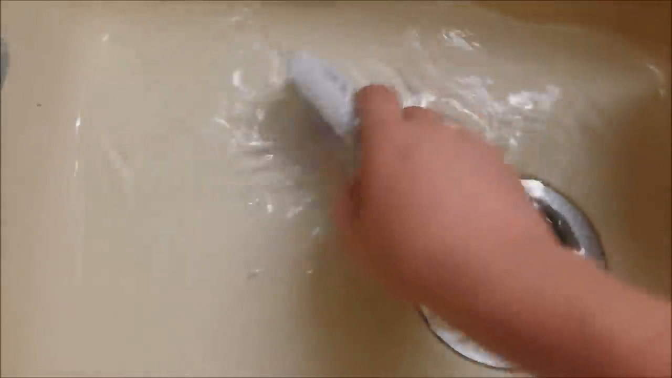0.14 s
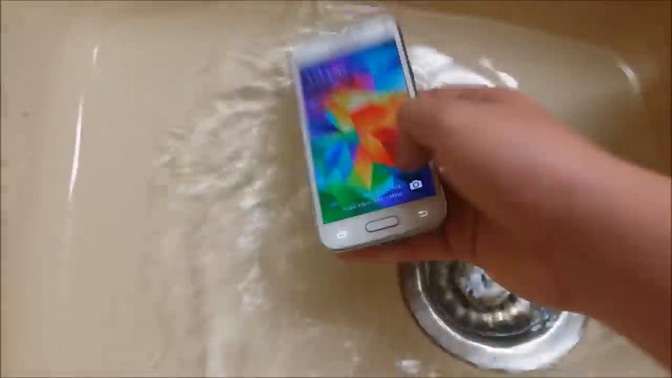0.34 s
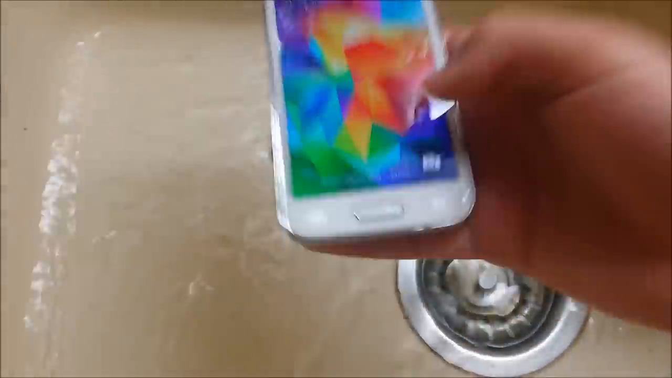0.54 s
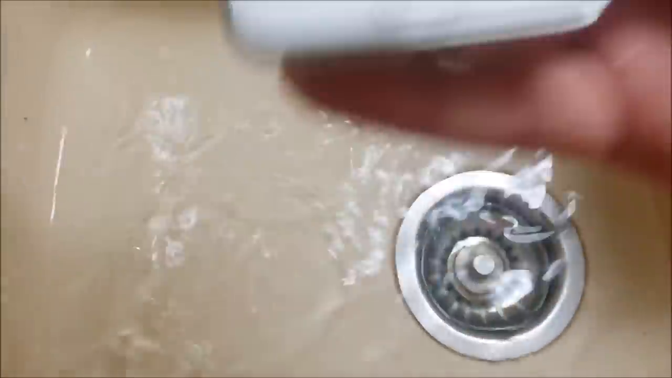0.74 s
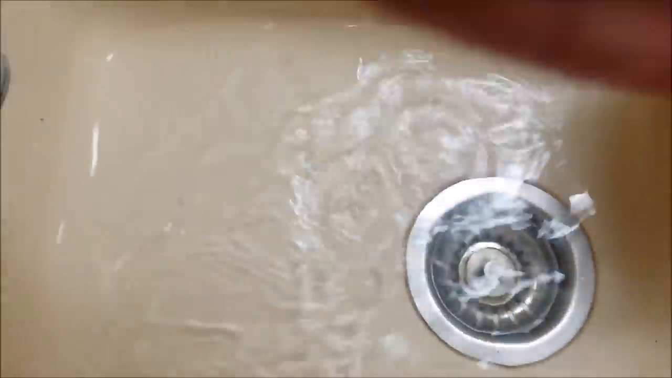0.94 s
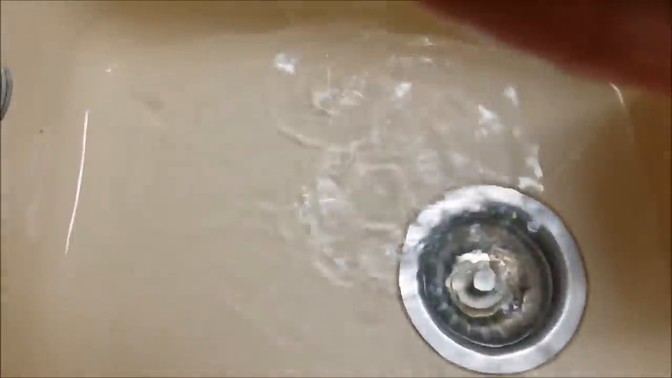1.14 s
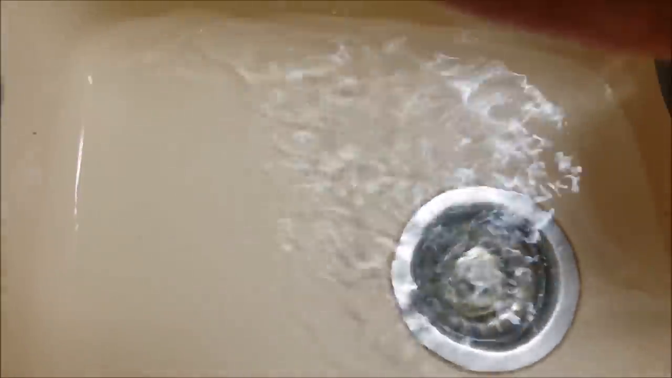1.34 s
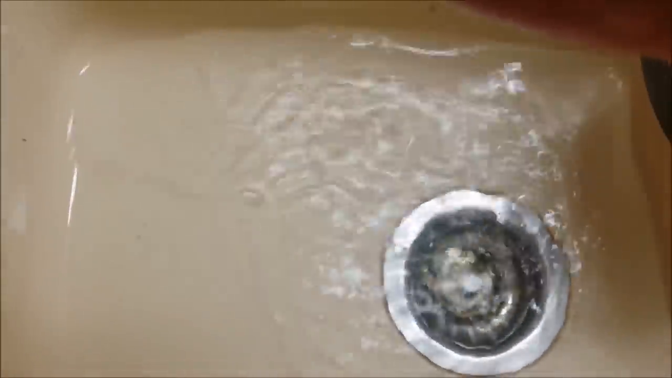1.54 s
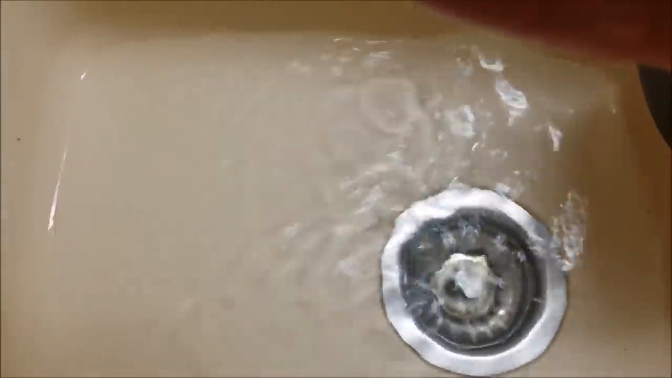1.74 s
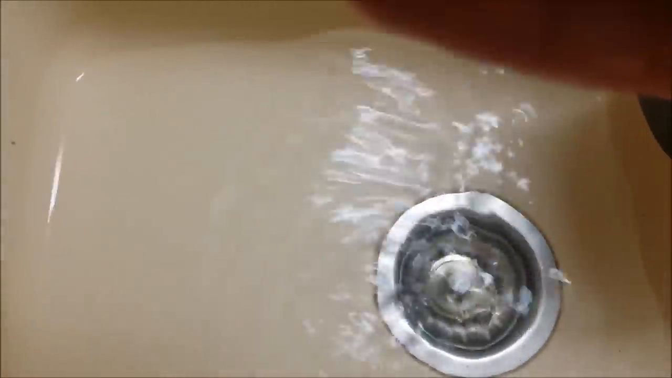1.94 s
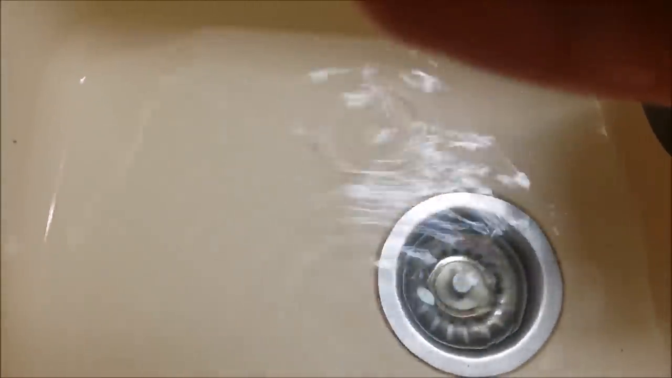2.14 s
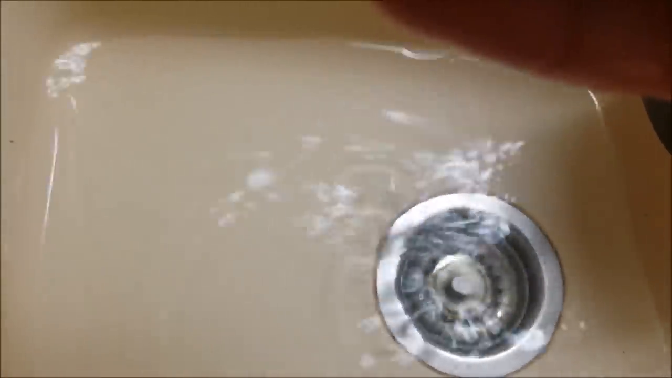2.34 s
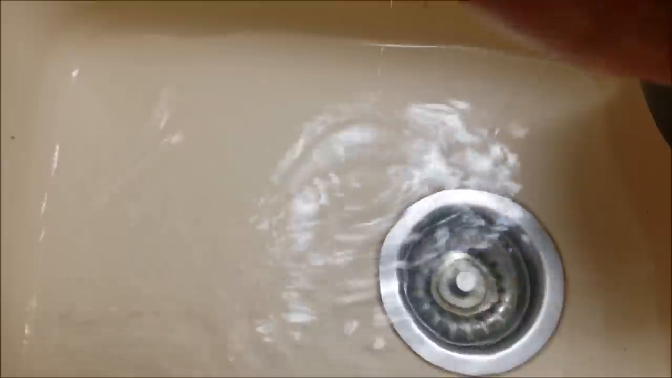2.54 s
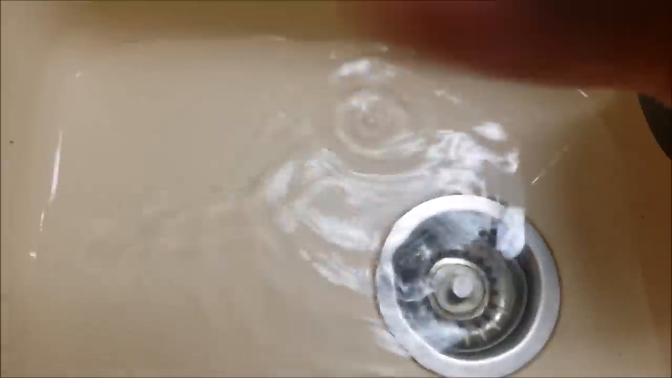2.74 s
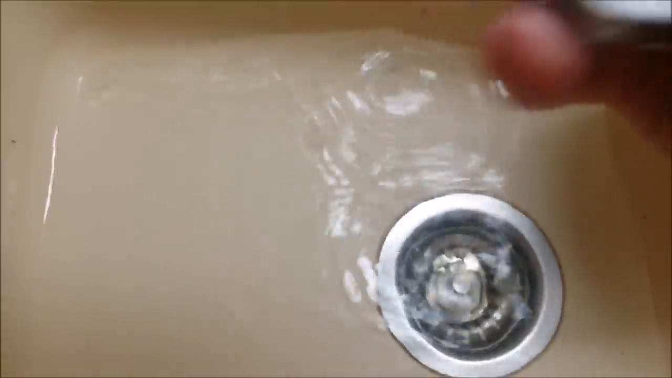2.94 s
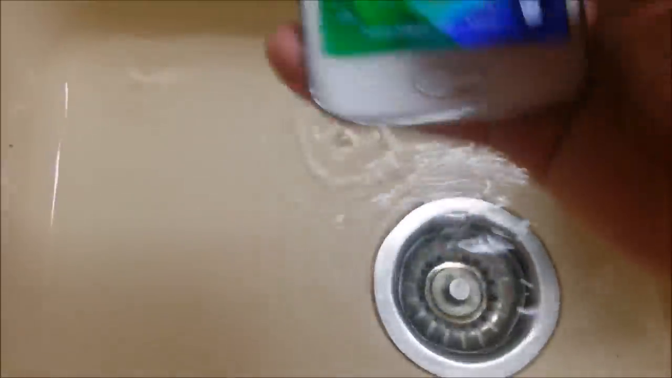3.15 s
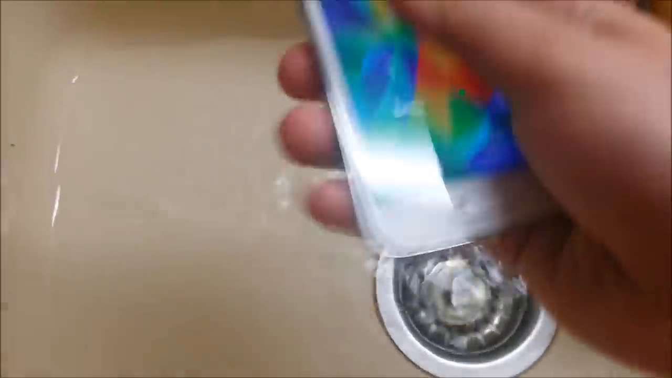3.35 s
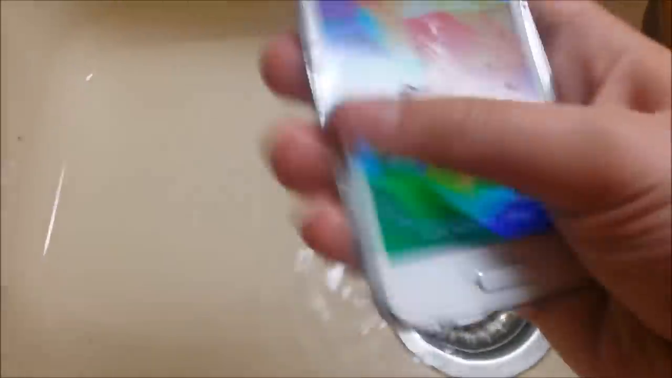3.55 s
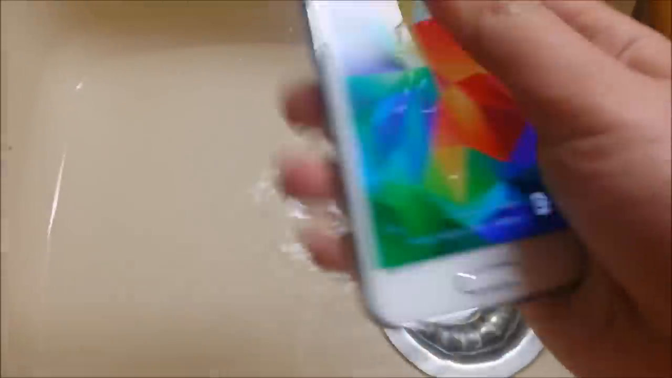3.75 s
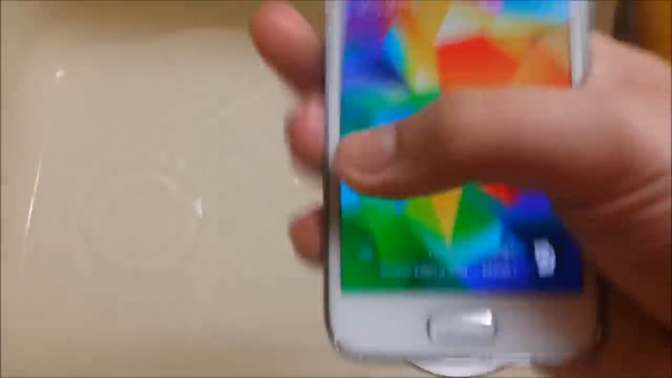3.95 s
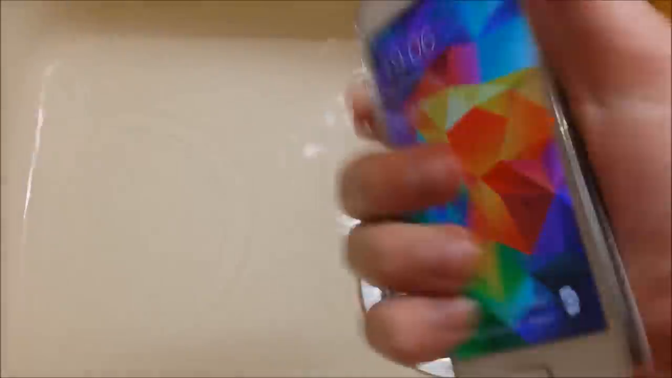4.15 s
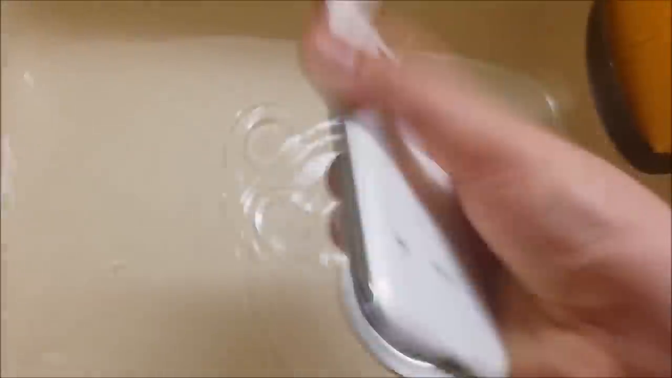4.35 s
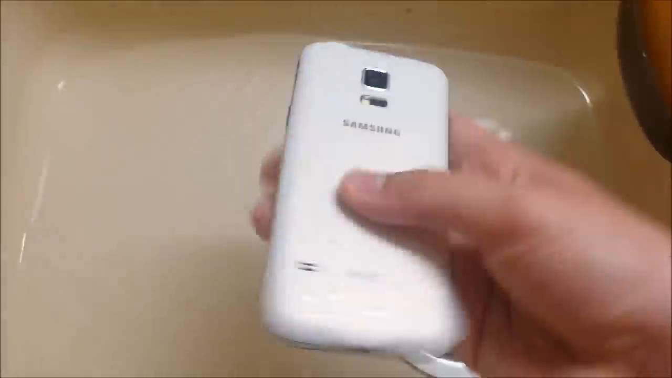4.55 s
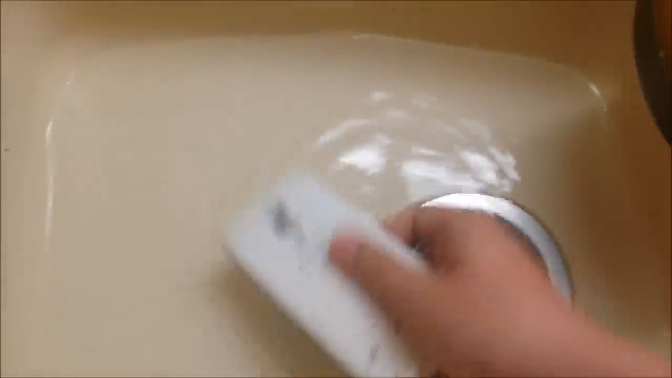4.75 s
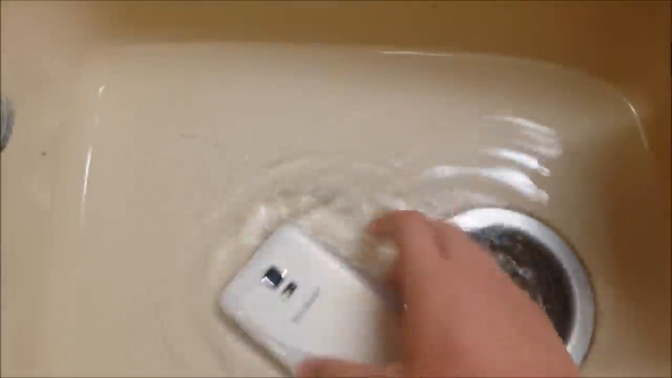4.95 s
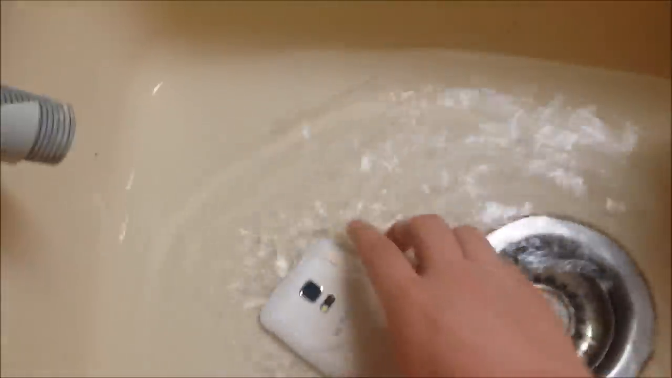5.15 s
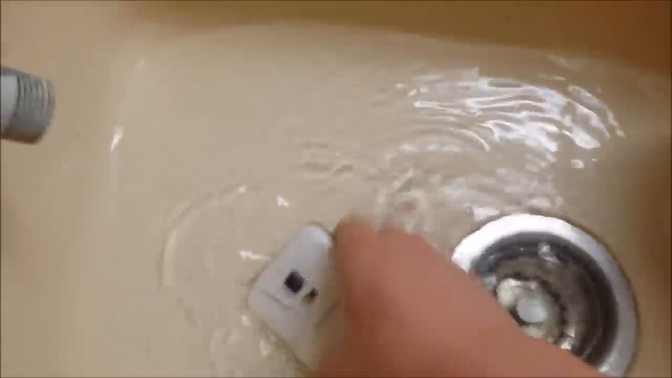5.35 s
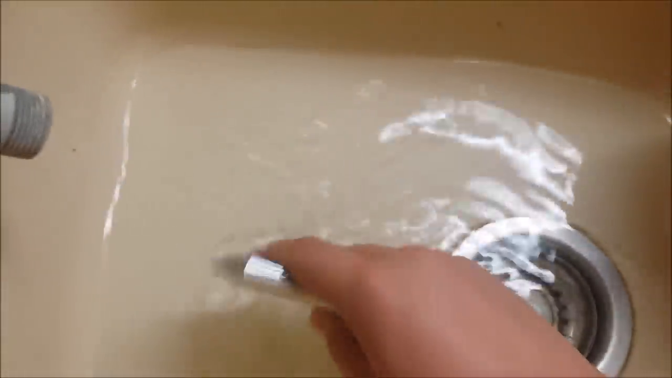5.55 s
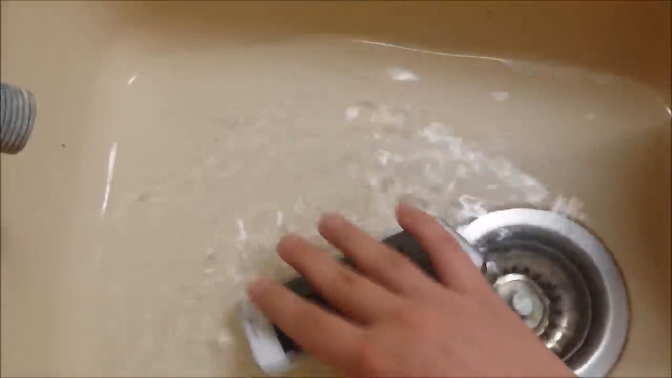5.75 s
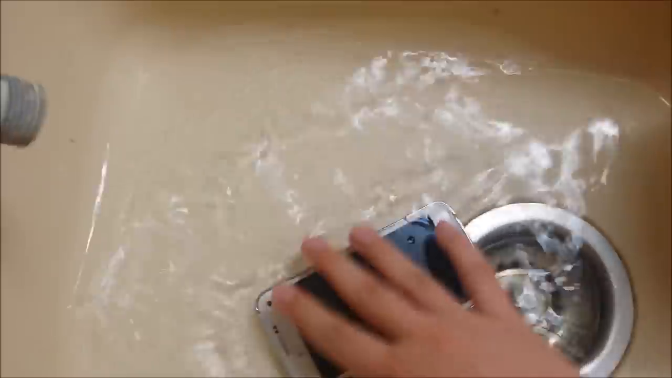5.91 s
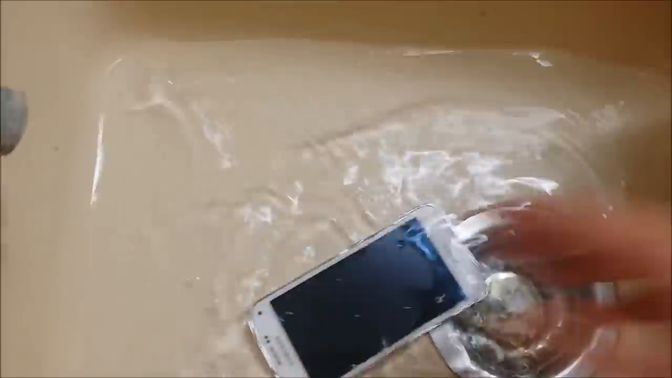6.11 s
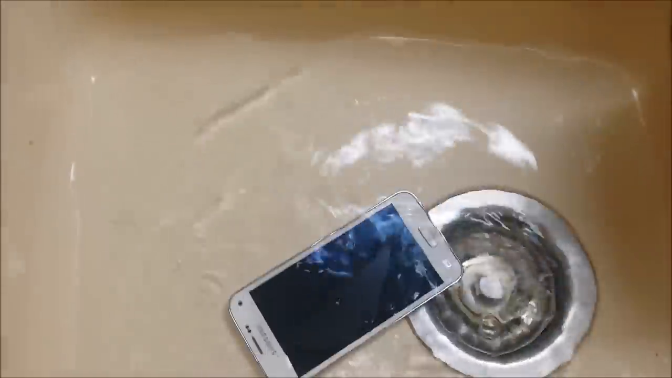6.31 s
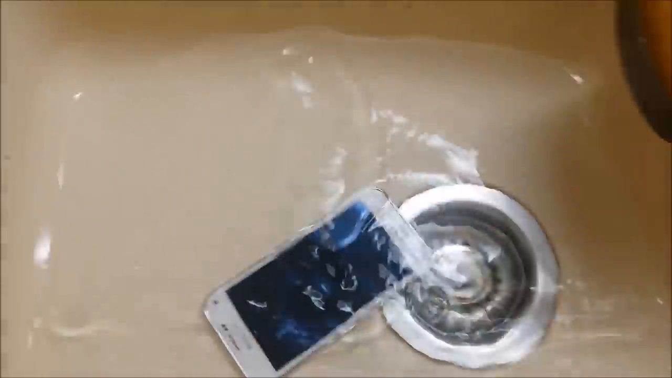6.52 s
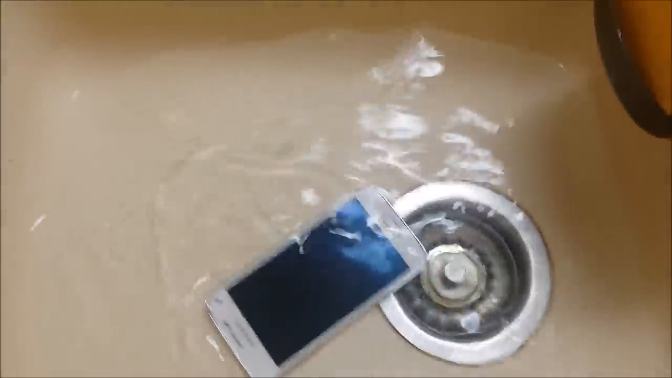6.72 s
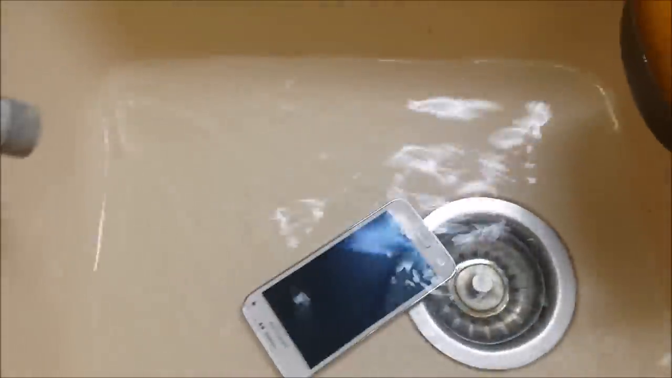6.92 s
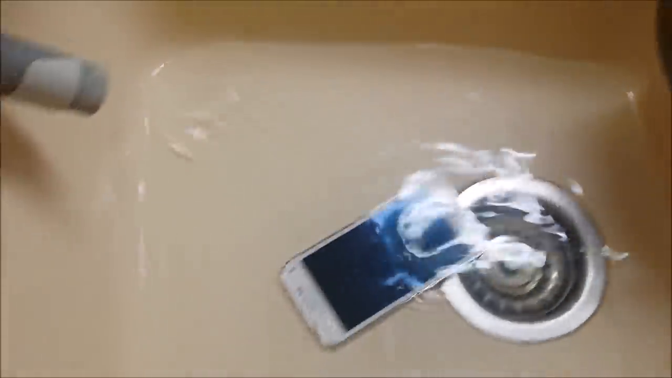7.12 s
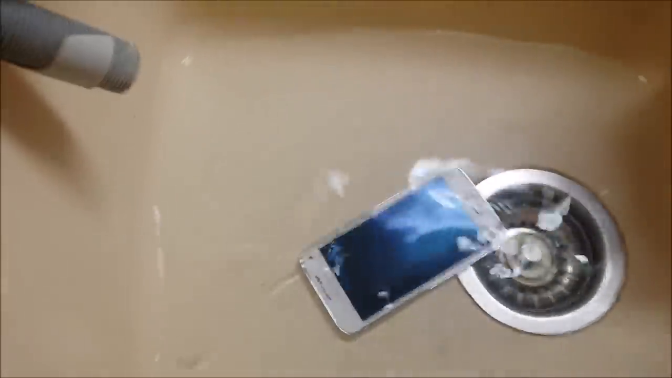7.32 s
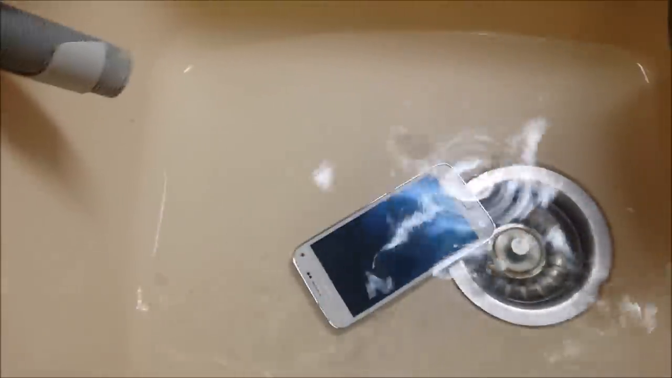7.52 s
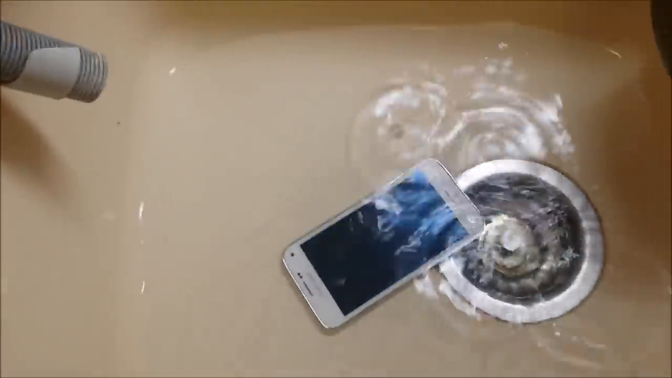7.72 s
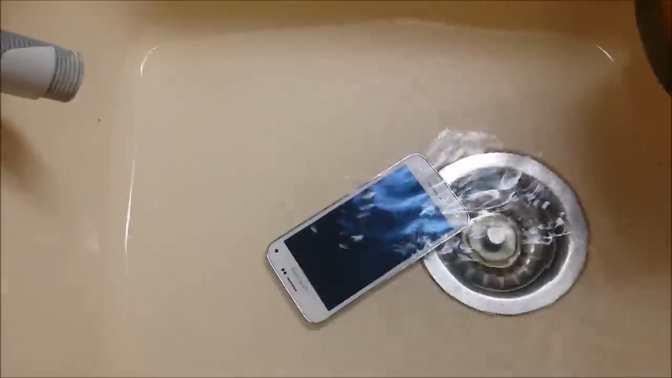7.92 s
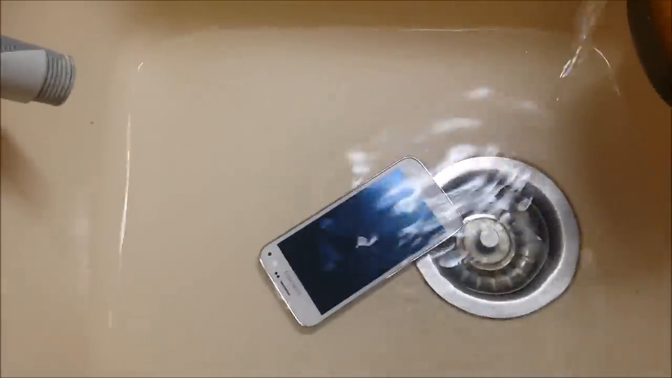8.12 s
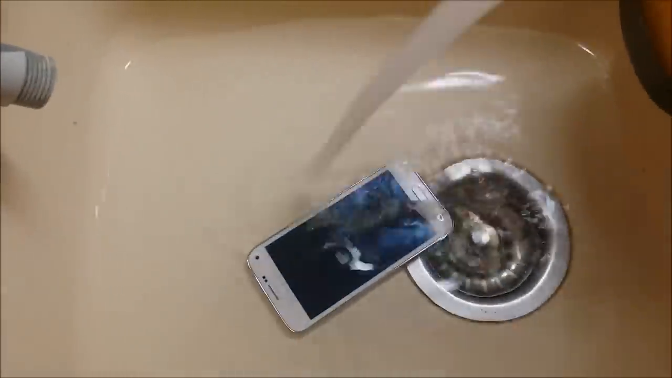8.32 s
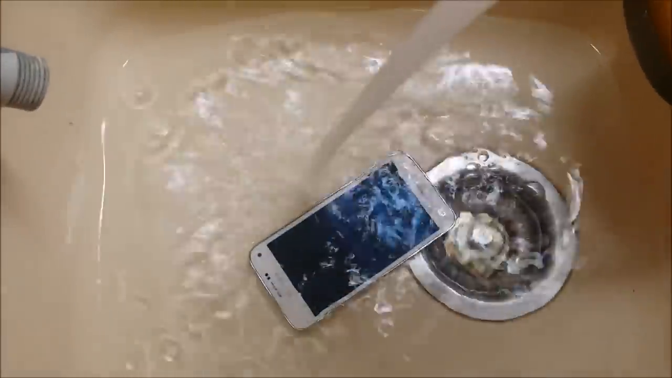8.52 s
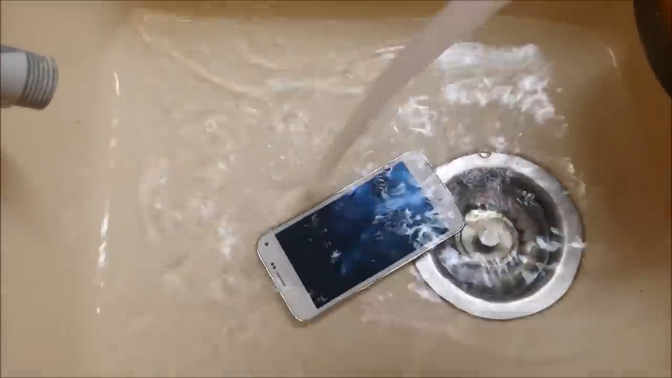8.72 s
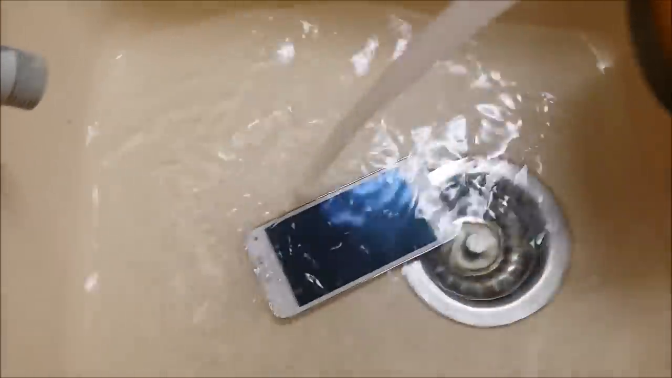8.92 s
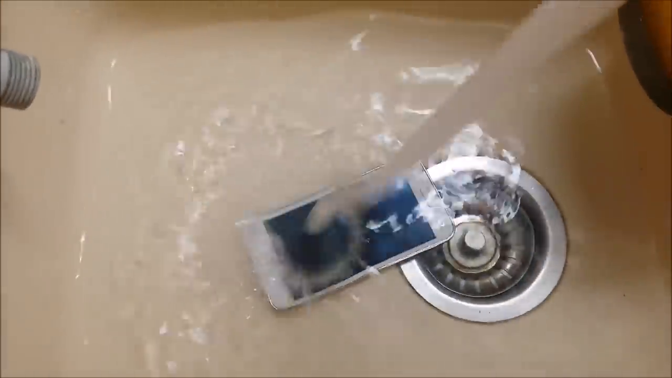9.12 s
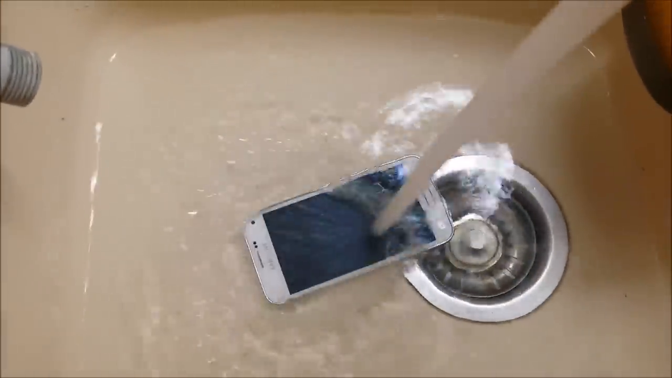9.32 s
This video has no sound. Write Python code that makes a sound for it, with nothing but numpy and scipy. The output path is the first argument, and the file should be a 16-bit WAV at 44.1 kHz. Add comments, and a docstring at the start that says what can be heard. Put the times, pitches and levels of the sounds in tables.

```python
"""Drips and sloshing come first, as a hand lifts a phone out of a shallow sink; a faint hum lies behind.
A wet thumb taps and rubs the glass: struck and slipping contacts ring the phone's modes.
The phone is laid back and knocks the ringing sink; drops are noise splats with rising bubble tones.
At the end a tap opens to a trickle, then a jet, made of hissing noise bands and bubble grains.
Two microphone ports close above: the right bright, the left shaded; the recorder's grip creaks at the left."""
import sys
import numpy as np
from scipy import signal
from scipy.fft import rfft, irfft, next_fast_len
from scipy.io import wavfile
from scipy.ndimage import uniform_filter1d

SR = 44100
rng = np.random.default_rng(int(sys.argv[2]) if len(sys.argv) > 2 else 0)


def unload_audio(sound):
    """Save the sound as a 16-bit wav file, at the path given as the first command line argument."""
    columns = np.transpose(np.atleast_2d(sound))
    # keep every value between -1 and 1, then stretch to whole-number steps
    steps = np.round(np.clip(columns, -1, 1) * 32767)
    wavfile.write(sys.argv[1], SR, steps.astype(np.int16))


N = 417627
T = np.arange(N) / SR   # s

# Colour of a splat on water or wet glass. Each row: frequency in Hz, density in dB per Hz.
SPLAT_COLOUR = [(300, -5), (800, -0.5), (2500, 0.5), (8800, 9), (16000, -0.5)]
# Modes of the phone held in the hand. Each row: frequency in Hz, level in dB, t60 in seconds (taps only).
PHONE_MODES = [(265, 0, 0.05), (700, -4.5, 0.046), (832, -2, 0.042), (1063, -8.5, 0.09),
               (1375, 8.5, 0.0082), (2010, 3, 0.015), (2580, 2, 0.0076), (3260, 1.5, 0.018)]


def from_db(db):
    """Gain of a level in dB."""
    return 10 ** (np.asarray(db) / 20)


def rms_one(x):
    """Scaled to rms 1."""
    return x / np.sqrt(np.mean(x ** 2) + 1e-20)


def in_time(rows):
    """Columns of a level curve in dB at every sample; -120 dB outside it."""
    s, *columns = np.transpose(rows)
    return [np.interp(T, s, column, left=-120, right=-120) for column in columns]


def at_hz(points, hz):
    """A spectrum read on a log frequency axis."""
    points = np.array(points)
    return np.interp(np.log(hz), np.log(points[:, 0]), points[:, 1])


def coloured(x, db_of_hz):
    """Filter by a smooth gain curve in dB."""
    size = next_fast_len(N)
    hz = np.maximum(np.arange(size // 2 + 1) * SR / size, 1)
    return irfft(rfft(x, size) * from_db(db_of_hz(hz)), size)[..., :N]


def band(x, low_hz, high_hz):
    """Butterworth band-pass."""
    edges = [low_hz, min(high_hz, .45 * SR)]
    return signal.sosfilt(signal.butter(2, edges, "band", fs=SR, output="sos"), x)


def soft(x, cut_hz):
    """A soft contact: two one-pole low-passes."""
    r = np.exp(-2 * np.pi * cut_hz / SR)
    return signal.lfilter([(1 - r) ** 2], [1, -2 * r, r * r], x)


def drift(rate):
    """Slow random wander of rms 1, low-passed at rate (Hz) on every 20th sample."""
    r = np.exp(-2 * np.pi * rate * 20 / SR)
    slow = signal.lfilter([1], [1, -2 * r, r * r], rng.standard_normal(N // 20 + 2002))[2000:]
    return np.interp(np.arange(N) / 20, np.arange(len(slow)), rms_one(slow))


def swells(events_db, rise_db_per_s, fall_db_per_s):
    """Gain that climbs to each (s, dB) and falls away after it."""
    gain = 0
    for s, db in events_db:
        below_db = np.where(T < s, rise_db_per_s * (s - T), fall_db_per_s * (T - s))
        gain = gain + from_db(db - below_db)
    return gain


def add(out, s, x):
    """Mix x into out from time s."""
    i = round(s * SR)
    out[i:i + len(x)] += x[:N - i]


def ring(clicks, hz, t60):
    """A resonator: a unit click sets a dying sine of initial height 1 ringing."""
    r, w = from_db(-60 / (t60 * SR)), 2 * np.pi * hz / SR
    return signal.lfilter([0, np.sin(w)], [1, -2 * r * np.cos(w), r * r], clicks + 1e-18)


def struck(events, modes, scatter_db, spread_db=0):
    """Every blow excites every mode by chance; spread_db per octave weakens modes far from its last column (Hz)."""
    out, rows = 0, np.array(events)
    places = np.round(rows[:, 0] * SR).astype(int)
    chance = rng.standard_normal((len(events), len(modes)))
    for k, (hz, level_db, t60) in enumerate(modes):
        clicks = np.zeros(N)
        away_db = spread_db * np.abs(np.log2(hz / np.abs(rows[:, -1])))
        clicks[places] = from_db(rows[:, 1] + level_db + scatter_db * chance[:, k] - away_db)
        out = out + ring(clicks, hz, t60)
    return out


def dying_noise(events_db, t60):
    """White noise that swells quickly at each (s, dB) and dies away."""
    rise_s = 0.0014
    clicks = np.zeros(N)
    clicks[[round(s * SR) for s, db in events_db]] = from_db([db for s, db in events_db])
    fall = signal.lfilter([1], [1, -from_db(-60 / (t60 * SR))], clicks + 1e-18)
    return soft(fall, 1 / (2 * rise_s)) * rng.standard_normal(N)


def stereo_noise(db_of_hz):
    """Two channels of noise, most alike in the bass and little related above; rms 1."""
    # Likeness of left and right. Each row: frequency in Hz, likeness from -1 to 1.
    likeness = [(60, 1), (240, 0.78), (950, -0.15), (3770, -0.19), (15000, 0.16)]

    def share_db(hz, sign):
        return db_of_hz(hz) + 10 * np.log10(1 + sign * np.clip(at_hz(likeness, hz), -.99, .99))

    mid = coloured(rng.standard_normal(N), lambda hz: share_db(hz, 0.85))
    side = coloured(rng.standard_normal(N), lambda hz: share_db(hz, -1))
    return rms_one(np.array([mid + side, mid - side]))


def bubble(hz, t60, rise):
    """A ringing bubble whose pitch climbs by the share rise while it dies."""
    life = np.minimum(T[:round(t60 * SR) + 2] / t60, 1)
    return np.sin(2 * np.pi * hz * t60 * life * (1 + rise * life / 2)) * from_db(-60 * life)


def grains(per_s, low_hz, high_hz, cycles, size_db):
    """Random bubbles of uneven size, each dying by 60 dB in the given cycles; rms 1."""
    sizes = from_db(size_db * np.minimum(rng.exponential(1, N), 4)) * rng.choice([-1, 1], N)
    born, dealt = rng.random(N) < per_s / SR, rng.integers(0, 16, N)
    out = 0
    for k, hz in enumerate(np.geomspace(low_hz, min(high_hz, .3 * SR), 16)):
        births = sizes * born * (dealt == k)
        out = out + signal.oaconvolve(births, bubble(hz, cycles / hz, .5))[:N]
    return rms_one(out)


def room_air():
    """Far hiss is coloured noise, the mains hum a wavering sine, the stir of hands and water low noise."""
    # Colour of the far hiss. Each row: frequency in Hz, density in dB per Hz.
    air_colour = [(25, -15.5), (85, 8.5), (140, -5.5), (230, -24.5), (450, -11.5), (750, -20), (1100, -13),
                  (1900, -22), (3300, -15.5), (6000, -29.5), (8500, -23), (16000, -31)]
    # Its lean to one side. Each row: frequency in Hz, left over right in dB.
    air_balance = [(60, -1), (240, -14.5), (950, -2.5), (3770, 4.5), (15000, -8.5)]
    # Mains hum. Each row: frequency in Hz, typical rms level in dB.
    hum_lines = [(200, -77.5)]
    # Low stir of hands and water. Each row: time in seconds, level in dB.
    stir_curve = [(0, -52), (.9, -70), (2.8, -74.5), (3.4, -57.5), (4.6, -59), (7, -64), (8.1, -82.5),
                  (8.5, -57), (9.47, -55)]
    air = stereo_noise(lambda hz: at_hz(air_colour, hz))
    air = coloured(air, lambda hz: at_hz(air_balance, hz) * np.array([[.5], [-.5]]))
    hum = 0
    for hz, db in hum_lines:
        # 3 dB from the rms of a sine to its peak
        hum = hum + from_db(db + 3.0 + 1.6 * drift(4.8)) * np.sin(2 * np.pi * hz * T)
    flat = stereo_noise(lambda hz: 0 * hz)
    stir = from_db(in_time(stir_curve)[0]) * rms_one(band(flat, 64, 200))
    return from_db(-64.5) * air + hum + stir


def creaks():
    """The grip creaks on the recorder: uneven clicks and gritty chatter ring through the case."""
    # Each row: start in seconds, length in seconds, slips per second, level in dB rms.
    creak_rows = [(0.82, 0.038, 48, -62.5), (3.959, 0.059, 487, -30), (3.981, 0.0026, 410, -28),
                  (4.397, 0.0029, 300, -36), (4.365, 0.072, 454, -33.5), (4.432, 0.049, 150, -47),
                  (4.524, 0.021, 380, -36), (4.561, 0.024, 250, -37.5), (4.602, 0.02, 100, -45.5),
                  (8.132, 0.0038, 130, -52)]
    out = np.zeros(N)
    for s, length, per_s, db in creak_rows:
        n, count = round(length * SR), max(round(length * per_s), 1)
        place, size, grit = rng.random(64), rng.random(64), rng.standard_normal(4000)
        clicks = np.zeros(n + 400)
        spots = ((np.arange(count) + place[:count]) / count * n).astype(int)
        clicks[spots] = -from_db(-4.5 - 19 * size[:count])
        chatter = 0.00083 * np.sqrt(per_s) * grit[:n]
        clicks[:n] = (clicks[:n] + chatter) * (0.14 + np.hanning(n))
        body = ring(clicks, 2580, .002) + ring(clicks, 1700, .003)
        body = body + .7 * ring(clicks, 900, .005) + .4 * ring(clicks, 300, .012)
        add(out, s, from_db(db) * body / np.std(body[:max(n, 400)]))
    return soft(out, 8900)


def palm_bumps():
    """The palm bumps the recorder's case, which answers with a low ring."""
    # Each row: time in seconds, level in dB.
    bump_rows = [(3.979, -25), (4.398, -32), (4.538, -16)]
    # Mode of the case. Each row: frequency in Hz, level in dB, t60 in seconds.
    case_modes = [(137, -2.5, 0.028)]
    return struck(bump_rows, case_modes, scatter_db=3)


def loose_water():
    """Water runs off hand and phone after moves: fine spray crackles in clumps, larger bubbles slosh."""
    # Each row: time in seconds, fine spray level in dB, slosh level in dB.
    splashes = [(0.0, -71, -50), (0.197, -59, -51), (0.328, -57, -43), (1.555, -51, -64), (4.42, -49, -56),
                (4.501, -40, -36), (4.998, -48, -34.5), (5.081, -46.5, -57.5), (5.198, -72.5, -42),
                (5.547, -50.5, -36.5), (5.77, -56, -65), (5.977, -50, -39.5)]
    rise, spray_fall, slosh_fall = 582, 214, 157.5   # dB per s
    crackle = grains(600 * from_db(8 * drift(25)), 4200, 13000, cycles=14.0, size_db=4.5)
    slosh = grains(260 * from_db(3 * drift(12)), 300, 5000, cycles=26.0, size_db=3.0)
    slosh = band(slosh, 700, 9000)
    spray_gain = swells([(s, db) for s, db, _ in splashes], rise, spray_fall)
    slosh_gain = swells([(s, db) for s, _, db in splashes], rise, slosh_fall)
    return spray_gain * crackle + slosh_gain * slosh


def drops():
    """Each drop splats as noise, partly about the bubble's pitch; the trapped bubble rings and rises."""
    # Each row: time in seconds, drop level in dB, bubble pitch in Hz, bubble over drop level in dB.
    drop_rows = [(0.026, -38, 9100, 3.5), (0.04, -42, 3400, 11.5), (0.051, -40.5, 1450, -3),
                 (0.188, -42, 1370, -3), (0.216, -48, 3420, 5.5), (0.238, -37, 2040, -3.5),
                 (0.259, -38, 3680, 0), (0.317, -31, 9100, -18), (0.335, -34, 8700, 3.5),
                 (0.344, -23, 2680, -14.5), (0.377, -33.5, 1450, -10), (0.409, -31, 700, -12),
                 (0.438, -30.5, 3440, -3.5), (0.456, -25, 7200, -5.5), (0.497, -30.5, 3060, -8),
                 (0.552, -30, 2440, -20), (0.576, -35, 5330, -12), (0.607, -32.5, 4250, -9),
                 (0.653, -32.5, 2070, -4.5), (0.746, -37, 6950, -8), (1.104, -49, 8950, 6),
                 (1.153, -42.5, 806, -7.5), (1.199, -52.5, 7840, 7), (1.287, -49.5, 8100, 3.5),
                 (1.429, -38.5, 7800, -8), (1.557, -20, 4500, -27), (2.49, -59.5, 2790, 4),
                 (3.501, -36, 4600, -9), (3.78, -23, 8400, 0.5), (3.834, -22.5, 7900, -3),
                 (4.16, -30, 7880, -33), (4.471, -24, 2020, -29), (5.005, -27, 1360, -1.5),
                 (5.071, -16.5, 4660, -9), (5.179, -22.5, 1187, -8.5), (5.208, -20.5, 3750, -11.5),
                 (5.26, -37.5, 1660, -1.5), (5.281, -39.5, 8600, 10.5), (5.535, -32, 1390, 9.5),
                 (5.548, -15.5, 8300, -3), (5.557, -18, 1970, -5.5), (5.614, -27, 5900, -7),
                 (5.644, -23.5, 2650, -6), (5.694, -29, 2400, -12), (5.726, -33, 2380, -0.5),
                 (5.915, -17.5, 2400, -15.5), (5.987, -25.5, 3800, -9.5), (6.029, -24.5, 2580, -6),
                 (7.83, -45, 10900, -1), (8.225, -23, 575, -15), (8.415, -13.5, 2930, -7),
                 (8.477, -7.5, 7800, -11)]
    broad_db, near_db = -11.5, -14   # broad splat and the part about the pitch, against drop level
    out, t = np.zeros(N), T[:SR // 8]
    noise = rng.standard_normal((len(drop_rows), len(t)))
    for (s, level_db, hz, bubble_db), white in zip(drop_rows, noise):
        add(out, s, from_db(level_db + bubble_db) * bubble(hz, 70 / hz, .3))
        near = rms_one(band(white, .7 * hz, 1.6 * hz))
        near = near * from_db(-60 * t / .03) * np.minimum(t / .002, 1)
        add(out, s, from_db(level_db + near_db) * near)
    splats = soft(dying_noise([(row[0], row[1] + broad_db) for row in drop_rows], t60=.035), 12000)
    # steady noise of the same colour sets the level
    steady = coloured(rng.standard_normal(N), lambda hz: at_hz(SPLAT_COLOUR, hz))
    return out + coloured(splats, lambda hz: at_hz(SPLAT_COLOUR, hz)) / np.std(steady)


def knocks():
    """Phone and hand knock the sink: its modes ring, water cracks, a pitched push rumbles, the counter thuds."""
    # Each row: time in seconds, level in dB, crack against it in dB before an 8 dB lift, strongest pitch in Hz.
    knock_rows = [(0.105, -38, -23, 203), (0.341, -34.5, -55, 204), (4.973, -17.5, -3.5, 332),
                  (5.365, -28, -38, 185), (5.482, -22.5, -8, 1030), (5.941, -12, -19, 262),
                  (5.949, -14.5, -9.5, 310), (6.734, -33.5, -17, 545), (6.775, -22.5, -16, 467),
                  (7.727, -38, -9.5, 527)]
    # Modes of the sink. Each row: frequency in Hz, level in dB, t60 in seconds.
    sink_modes = [(165.3, -8, 0.29), (271.4, -11, 0.18), (433, -3.5, 0.13), (547.5, -9, 0.22),
                  (1030, 12, 0.036)]
    # Knocks that carry into the counter. Each row: time in seconds, level in dB.
    thud_rows = [(6.776, -13), (7.726, -41.5)]
    # crack and ring set in a little after the push
    cracks = [(s + 0.00055, level_db + crack_db + 8) for s, level_db, crack_db, _ in knock_rows]
    crack = band(dying_noise(cracks, t60=0.03), 660, 8000)
    rumble, t = np.zeros(N), T[:SR // 4]
    noise = rng.standard_normal((len(knock_rows), len(t)))
    for (s, level_db, _, hz), white in zip(knock_rows, noise):
        lumps = rms_one(band(white, 0.16 * hz, 1.66 * hz))
        lumps = lumps * from_db(-5.0 - 60 * t / 0.12) * np.minimum(t / 0.002, 1)
        add(rumble, s, from_db(level_db) * lumps)
        push = bubble(hz, 7.0 / hz, 0.069)
        add(rumble, s, from_db(level_db - 1.5) * push)
    thud = struck(thud_rows, [(60, -19, .2), (115, -14, .13)], scatter_db=1.0)   # (Hz, dB, t60 s)
    blows = [(row[0] + 0.00314, *row[1:]) for row in knock_rows]
    rings = band(struck(blows, sink_modes, scatter_db=3.0, spread_db=17.0), 140, 5000)
    return from_db(-2.0) * soft(rings, 1320) + crack + band(rumble, 180, 6100) + band(thud, 40, 157.2)


def thumb_taps():
    """The thumb taps the glass: the phone's modes ring softly under a short wet noise."""
    # Each row: time in seconds, level in dB, frequency that rings most in Hz.
    tap_rows = [(3.038, -44, 1110), (3.062, -32.5, 850), (3.444, -27, 500), (3.453, -20.5, 700),
                (3.691, -40, 1000), (3.707, -20, 890), (3.765, -21.5, 1100), (3.817, -21.5, 1300),
                (3.826, -22, 1140), (4.309, -26.5, 1300)]
    rings = struck(tap_rows, PHONE_MODES, scatter_db=3.0, spread_db=6.0)
    wet = dying_noise([(s, db - 26.0) for s, db, _ in tap_rows], t60=0.079)
    wet = coloured(wet, lambda hz: at_hz(SPLAT_COLOUR, hz))
    return from_db(-1.5) * soft(band(rings, 326, 6400), 2870) + wet


def rubs():
    """Wet skin sticks and slips on the glass: slips and chatter kick the phone, fast slips merge into a squeak."""
    # Each row: start in seconds, length in seconds, first and last slips per second (before the slow
    # gathering of speed), level in dB rms, unevenness from 0 to 1.
    rub_rows = [(2.895, 0.063, 230, 248, -49.5, 0.04), (3.168, 0.096, 295, 170, -43, 0.09),
                (3.337, 0.023, 864, 760, -27.5, 0.04), (3.385, 0.01, 750, 350, -33.5, 0.08),
                (3.538, 0.084, 287, 146, -37.5, 0.14), (3.704, 0.027, 850, 1120, -39.5, 0.05),
                (3.761, 0.031, 1220, 250, -36, 0.46), (4.298, 0.019, 600, 580, -46.5, 0.15),
                (4.5, 0.01, 760, 650, -33, 0), (4.55, 0.056, 190, 237, -38.5, 0.05)]
    grip_s = 0.0071   # a slow rub gathers speed in this time
    rub_t60_s = .013   # the pressing thumb damps the phone's ring
    out = np.zeros(N)
    for s, length, first, last, db, uneven in rub_rows:
        n, chance = round(length * SR), rng.standard_normal((3, 6000))
        wobble = uniform_filter1d(chance[0], size=100)[:n] * 10
        gather = 1 - np.clip(140 / first, 0, 1) * np.exp(-T[:n] / grip_s)
        rate = np.linspace(first, last, n) * gather * (1 + uneven * wobble)
        turns = np.cumsum(rate) / SR
        # one kick per whole turn
        slips = np.diff(np.floor(turns), prepend=0) * from_db(12 * uneven * chance[1, :n])
        chatter = 0.58 * np.sqrt(70 / SR) * chance[2, :n]
        fade = signal.windows.tukey(n, np.clip((240 / first) ** 2, 0, 1))
        kicks = np.pad((slips + chatter) * fade, (0, 800))
        # as the thumb travels the hand damps the phone anew: one set of modes passes into another
        slide = np.minimum(np.arange(len(kicks)) / n, 1)
        voice = 0
        for share, holds in zip((1 - slide, slide), chance[:2, -len(PHONE_MODES):]):
            for (hz, level_db, _), held in zip(PHONE_MODES, holds):
                mode = ring(kicks * share, hz * (1 + .1 * held), rub_t60_s)
                voice = voice + from_db(level_db + 3 * held) * mode
        # slow slips are softer
        voice = soft(soft(band(voice, last, 14000), 4 * first + 900), 9 * first + 900)
        add(out, s, from_db(db) * voice / np.std(voice[:n]))
    return out


def tap():
    """The valve whistles as it opens; the jet hisses in shifting patches and spits; entrained air gurgles below."""
    # A trickle, then a full jet. Each row: time in seconds, hiss level in dB, gurgle level in dB.
    flow_curve = [(8.1, -72, -70), (8.2, -52.5, -56), (8.3, -45.5, -43.5), (8.42, -39.5, -35.5),
                  (8.52, -24, -35.5), (9.22, -27, -33), (9.32, -24, -38), (9.47, -26.5, -34.5)]
    # Colour of the jet. Each row: frequency in Hz, density in dB per Hz.
    stream_colour = [(40, -12), (150, -8), (270, -4.5), (450, -13), (1000, -3.5), (2600, -4), (4300, -2.5),
                     (6900, -7), (7900, 4.5), (10000, -1.5), (16000, -9.5)]
    # The opening valve whistles in two puffs. Each row: time in seconds, level in dB.
    puffs = [(8.16, -49), (8.23, -43)]
    hiss_db, gurgle_db = in_time(flow_curve)
    wash = stereo_noise(lambda hz: at_hz(stream_colour, hz))
    together, edges = drift(90), 2000 * 1.16 ** np.arange(15)   # edges in Hz
    # each band swells on its own as the jet breaks up, all share a little flutter
    high = 0
    for k in range(14):
        swell_db = 1.8 * together + 3.0 * drift(45) + 2.3 * drift(7)
        # signs alternate from band to band
        high = high + (-1) ** (k + 1) * band(wash, *edges[k:k + 2]) * from_db(swell_db)
    spit = .35 * grains(500, 6000, 11000, cycles=24.0, size_db=4.0)
    spit = spit + .3 * grains(900, 2300, 8500, cycles=40.0, size_db=4.0)
    gurgle = rms_one(band(wash, 55.0, 1800) * from_db(2.0 * drift(25)))
    gurgle = gurgle + 0.47 * grains(830, 405, 2400, cycles=25.0, size_db=3.0)
    whistle = rms_one(band(band(rng.standard_normal((2, N)), 3700, 5870), 3700, 5870))
    whistle_gain = swells(puffs, rise_db_per_s=450, fall_db_per_s=250)
    return from_db(hiss_db) * (rms_one(high) + spit) + from_db(gurgle_db) * gurgle + whistle_gain * whistle


def room(x):
    """Sink walls and room answer with a short tail, another one at each port; its treble dies sooner."""
    low_t60_s, treble_t60_s = 0.27, 0.17
    t = T[:SR // 2]
    noise = band(rng.standard_normal((2, len(t))), 110, 12000)
    low = soft(noise, 2000)
    tail = low * from_db(-60 * t / low_t60_s) + (noise - low) * from_db(-60 * t / treble_t60_s)
    tail = tail * np.minimum(t / 0.0039, 1)
    tail /= np.sqrt(np.sum(tail ** 2, axis=1, keepdims=True))
    return from_db(-7.5) * signal.fftconvolve(x[None], tail, axes=1)[:, :N]


def ports(x, shade):
    """The left port hears the sound shaded and its treble late; the two gains add up to 2."""
    # Left port against right at full shade. Each row: frequency in Hz, level in dB.
    port_shade = [(60, -9.5), (380, -12.5), (1300, -9.5), (2400, -19), (4400, -16.5), (8200, -58),
                  (15000, -21)]
    lag_s = 0.000491

    def gains_db(hz):
        left = from_db(shade * at_hz(port_shade, hz))
        return 20 * np.log10(np.array([2 * left / (1 + left), 2 / (1 + left)]))

    left, right = coloured(x * np.ones((2, 1)), gains_db)
    bass = soft(left, 5800)   # the bass bends round the case at once
    return np.array([bass + np.interp(T - lag_s, T, left - bass), right])


def scene():
    """Room, grip, water and sink, phone and tap, each as it reaches the two ports."""
    grip = band(creaks() + palm_bumps(), 67, 15700)
    grip = (grip + from_db(-9.5) * room(grip)) * from_db([[6], [-14]])   # left, right
    water = loose_water() + drops() + knocks()
    phone = thumb_taps() + rubs()
    near = ports(water + room(water), shade=0.39)
    near = near + ports(phone + from_db(-5.5) * room(phone), shade=0.41)
    return room_air() + grip + near + ports(tap(), shade=0.46)


def record(dry):
    """A steep low-pass cuts the top, 70 dB down from 16500 Hz up."""
    return signal.sosfilt(signal.cheby2(14, 70, 16500, fs=SR, output="sos"), dry)


dry = scene()
out = record(dry)
unload_audio(out)
```